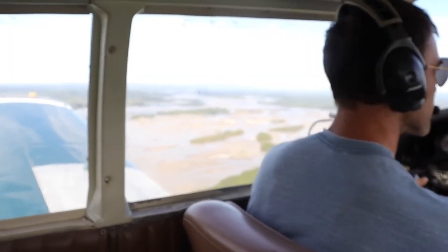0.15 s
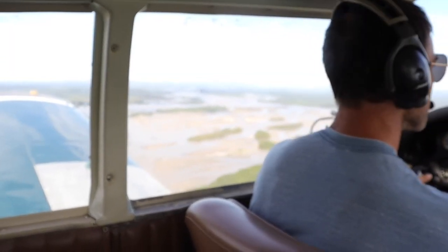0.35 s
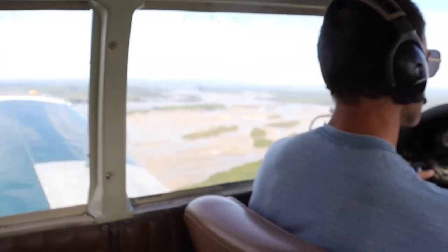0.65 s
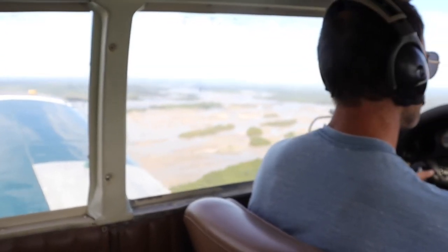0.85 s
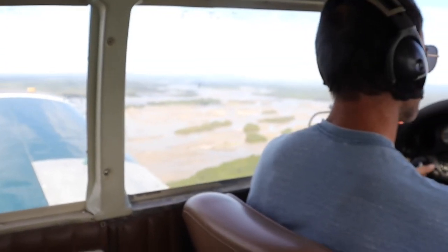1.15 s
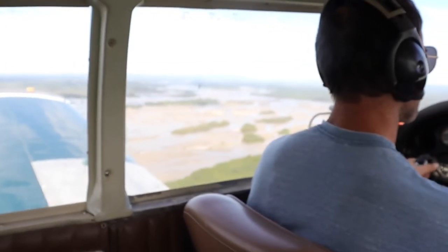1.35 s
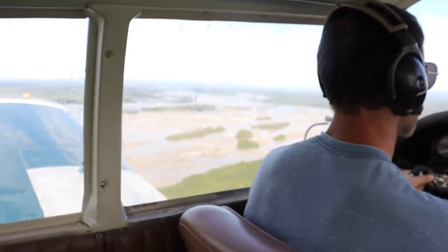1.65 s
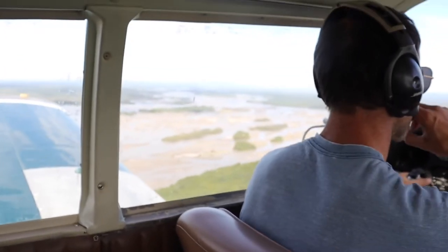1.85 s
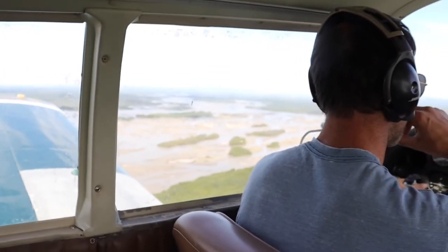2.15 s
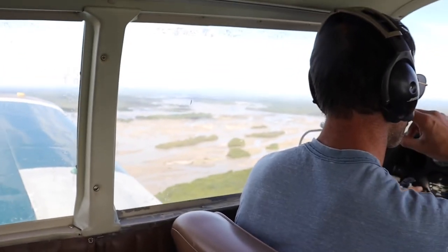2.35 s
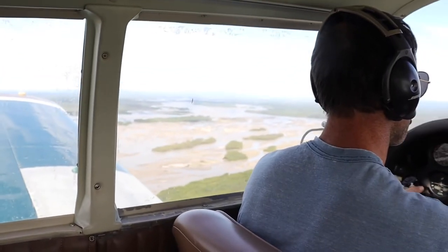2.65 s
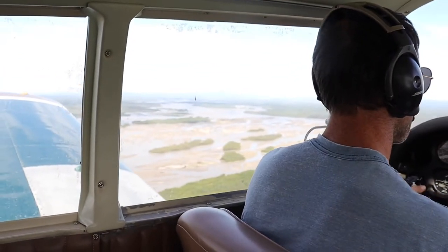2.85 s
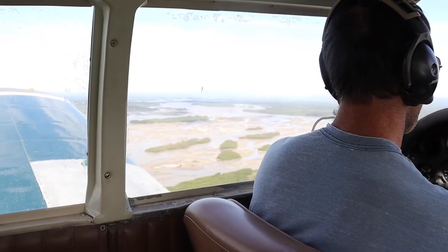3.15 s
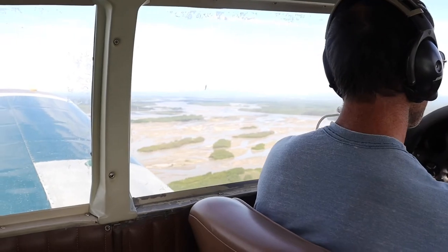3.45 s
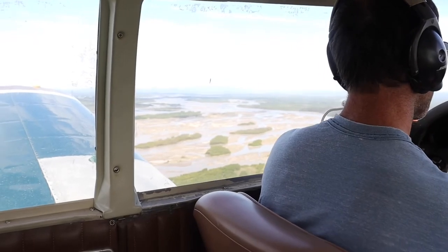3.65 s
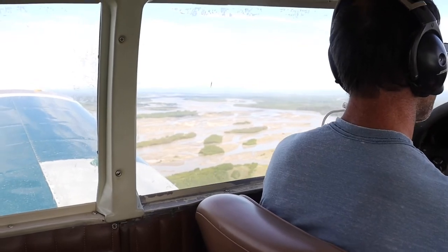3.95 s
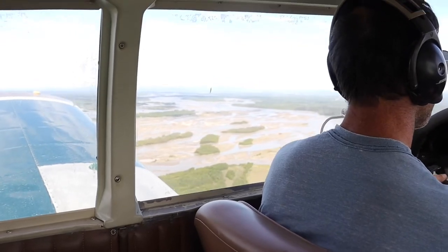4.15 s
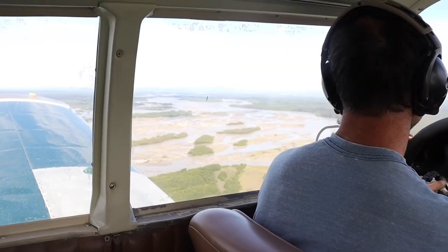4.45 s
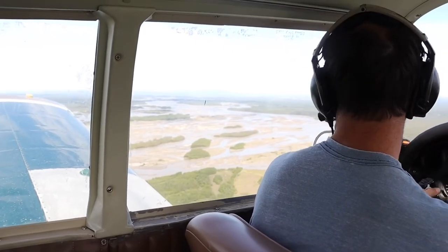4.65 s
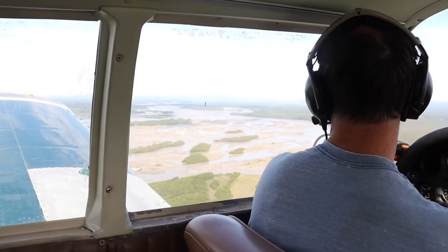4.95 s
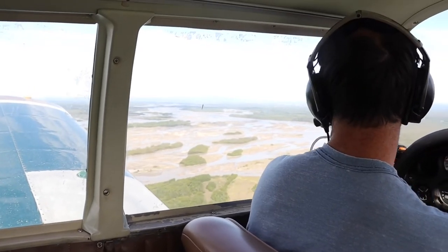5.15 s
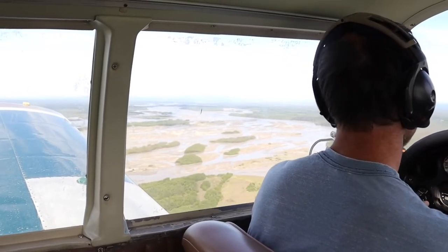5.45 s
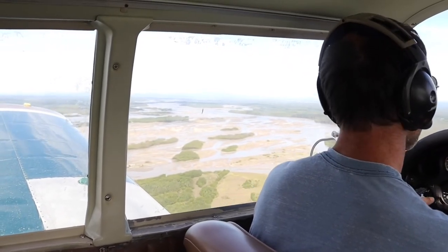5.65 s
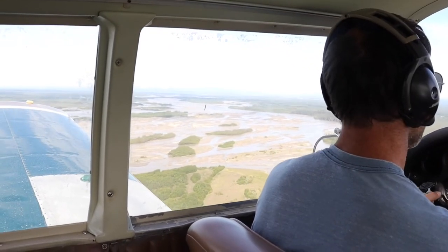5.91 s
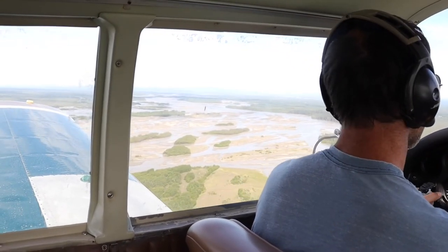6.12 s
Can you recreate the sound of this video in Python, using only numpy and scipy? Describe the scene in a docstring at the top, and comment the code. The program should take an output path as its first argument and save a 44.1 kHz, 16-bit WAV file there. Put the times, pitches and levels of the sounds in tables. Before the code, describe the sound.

A light airplane's intercom in cruise, heard directly from the wire, dry and the same in both ears. Until about 0.14 seconds a scrap of throbbing cabin roar plays, then it is chopped off. Subdued hiss remains, swelling over the next second or so, with faint engine hum, buzz, thin steady whines and a high tone that swells periodically. At 2.05 a hard pop and rumbling air buffet hit the boom microphone, followed at 2.14 by a louder, deeper, raspier one, overloaded and falling in pitch. Muffled roar follows, brightening until it cuts off at 2.5. The hiss is pushed down, then slowly rises. At 3.78 a single low, rounded thump with little rasp opens another stretch of roar, cut at 4.13. Hiss and whines fade back up and continue steadily to the end, about 6.4.

```python
"""A clipped scrap of cabin roar, then hiss and thin electrical whines: a light airplane's intercom in cruise.
Air buffets the boom microphone, twice in quick succession while a hand shields it, then once more.
Each buffet is a pop, rumbling noise of falling pitch and a rasp; the roar is throbbing noise and engine tones.
The squelch lets the microphone through at set times over a steady line of noise and sines.
Gain control clamps down on every burst, then slowly lets the hiss swell back."""
import sys
import numpy as np
from scipy import signal
from scipy.fft import rfft, irfft
from scipy.io import wavfile

SR = 44100
rng = np.random.default_rng(int(sys.argv[2]) if len(sys.argv) > 2 else 0)


def unload_audio(sound):
    """Save the sound as a 16-bit wav file, at the path given as the first command line argument."""
    columns = np.transpose(np.atleast_2d(sound))
    # keep every value between -1 and 1, then stretch to whole-number steps
    steps = np.round(np.clip(columns, -1, 1) * 32767)
    wavfile.write(sys.argv[1], SR, steps.astype(np.int16))


N = 276948
TIME = np.arange(N) / SR

# Air buffets on the capsule; rasp is relative to the eddies:
# start_s, steady_s, level_db, fall_db_per_s, first_centre_hz, last_centre_hz, rasp_db
AIR_BUFFETS = [(2.0453, 0.098, 27.5, 900, 473, 300, -8.5), (2.135, 0.06, 33.5, 900, 397, 170, -4),
               (3.776, 0.041, 28, 107, 315, 110, -30)]
# Pop of the diaphragm that starts each buffet: start_s, height_db, pitch_hz, t60_s
DIAPHRAGM_POPS = [(2.0455, 32, 650, .05), (2.1367, 38.5, 332, 0.048), (3.7751, 30.5, 273, .07)]
# Colour of the air rasping in the foam cover: frequency_hz, density_db_per_hz (relative)
RASP_COLOUR = [(300, -28), (750, -2.5), (1250, 2), (2100, -4.5), (3500, -16), (8000, -47)]
# Times when the squelch is open: start_s, end_s
SQUELCH_OPEN = [(-.1, .137), (2.0455, 2.119), (2.137, 2.508), (3.7753, 4.130)]
# Shielding of the microphone by a turn of the head, later by a hand:
# start_s, end_s, clearing_s, depth (0-1)
MIC_SHIELDS = [(0, 0.03, 0.12, 0.16), (1.754, 2.193, .2, 0.99)]
# Colour of the cabin through the microphone: frequency_hz, density_db_per_hz (relative)
CABIN_COLOUR = [(40, -46.5), (100, -22), (300, -17.5), (520, -12), (820, 2), (1060, -0.5), (1350, -5),
                (3000, -4.5), (4200, -9), (5500, -18), (7200, -23), (10000, -34.5), (15500, -42)]
# Engine drone, relative to the roar or to the hum level: multiple of the crank pitch, level_db
ENGINE_DRONE = [(2, -45), (3, -27), (4, -39), (6, -33.5), (7, -32.5), (12, -27)]
# Colour of the line hiss: frequency_hz, density_db_per_hz (relative)
HISS_COLOUR = [(25, -19), (60, -7.5), (150, -4), (400, -2), (800, 0.5), (1700, 1), (2600, -2), (4000, -5.5),
               (7000, -7.5), (11000, -8.5), (15800, -12)]
# Whine of the electrics: multiple of the whine pitch, level_db
WHINE_PARTIALS = [(1, -31), (2, -44.5), (3, -42.5), (4, -47), (5, -35.5)]
# Ignition buzz: multiple of the buzz pitch, level_db
BUZZ_PARTIALS = [(3, -47.5), (4, -56), (5, -48.5), (6, -43.5), (7, -45), (8, -48), (9, -48), (14, -58)]

# All source levels are rms dB ahead of the gain control
ROAR_DB, ROAR_TREBLE_DB = 11, 1
SHIELD_DB, SHIELD_TREBLE_DB = 10, -25  # full shielding makes the roar louder and duller
HISS_DB, SUPPLY_DB, HUM_DB = -22.5, -30.5, -24
CRANK_HZ, WHINE_HZ, BUZZ_HZ, SUPPLY_HZ, STROBE_HZ = 33.5, 996.8, 194.3, 14138.7, 3236
# Slow stage of the gain control: usual depth, share taken of any deeper cut, recovery
SLOW_DEPTH_DB, SLOW_SHARE, SLOW_DB_PER_S = 19.5, 0.33, 12.5
CUTOFF_HZ = 15900


def buffets(slowing_s=0.066, width=1.68, shove_db=-17, shove_hz=230, flutter_db=1.0, vent_hz=50):
    """Gusts rumble and rasp, deeper as the air slows; the capsule's vent lets out the lowest part."""
    out = np.zeros(N)
    age = TIME[:SR // 2]
    for start, steady, level_db, fall_db, first_hz, last_hz, rasp_db in AIR_BUFFETS:
        centre_hz = last_hz + (first_hz - last_hz) * np.exp(-age / slowing_s)
        air, push = rng.standard_normal((2, len(age)))
        # two passes steepen the band
        band = moving_band(moving_band(air, centre_hz, width), centre_hz, width)
        eddies = rms_one(band / np.sqrt(centre_hz))
        shove = from_db(shove_db) * rms_one(butter(push, shove_hz, "low"))
        rasp = from_db(rasp_db) * noise(RASP_COLOUR)[:len(age)]
        flutter = flutter_db * drift(50)[:len(age)]
        force_db = level_db - fall_db * np.maximum(age - steady, 0) + flutter
        add(out, start, from_db(force_db) * (eddies + shove + rasp))
    add_pops(out, age)
    return butter(out, vent_hz, "high")


def add_pops(out, age):
    """The diaphragm is knocked and rings down as a decaying sine, first swing negative."""
    for start, height_db, hz, t60 in DIAPHRAGM_POPS:
        decay = np.exp(-np.log(1000) * age / t60)
        add(out, start, -from_db(height_db) * decay * np.sin(2 * np.pi * hz * age))


def cabin(treble_hz=4500, throb=0.056):
    """Slipstream and engine through the noise-cancelling capsule; the roar throbs with the firings."""
    shielded = shielding()
    level_db = ROAR_DB + SHIELD_DB * shielded
    treble_db = ROAR_TREBLE_DB + SHIELD_TREBLE_DB * shielded
    roar = noise(CABIN_COLOUR) * (1 + throb * tones(CRANK_HZ, [(3, 0)]))
    # a shelf: the treble alone is raised or lowered
    roar = roar + (from_db(treble_db) - 1) * butter(roar, treble_hz, "high", order=1)
    drone = tones(CRANK_HZ + 0.093 * drift(4.9), ENGINE_DRONE)
    return from_db(level_db) * (roar + drone)


def shielding():
    """How closely the microphone is shielded, 0 to 1: on at once, cleared along a ramp."""
    closeness = np.zeros(N)
    for start, end, clearing_s, depth in MIC_SHIELDS:
        clearing = np.clip(1 - (TIME - end) / clearing_s, 0, 1)
        closeness += depth * (TIME >= start) * clearing
    return closeness


def line():
    """Coloured noise and gently wandering sines: hiss, whines and engine hum always on the wire."""
    hiss = from_db(HISS_DB + 0.67 * drift(12)) * noise(HISS_COLOUR)
    whine = tones(WHINE_HZ + 0.26 * drift(2.0), WHINE_PARTIALS) * from_db(0.84 * drift(16))
    buzz = tones(BUZZ_HZ + 0.3 * drift(1.99), BUZZ_PARTIALS)
    supply = tones(SUPPLY_HZ + 0.54 * drift(1), [(1, SUPPLY_DB)])
    hum = from_db(HUM_DB) * tones(CRANK_HZ + 0.194 * drift(3), ENGINE_DRONE)
    return hiss + whine + buzz + supply + hum + strobe()


def strobe(first_s=0.18, period_s=1.34, charge_s=0.36, charging_db=-35.961, idle_db=-43.961, wander_hz=3):
    """A thin whine swells at regular intervals, as of a strobe light recharging after each flash."""
    is_charging = 1. * ((TIME - first_s) % period_s < charge_s)
    level_db = idle_db + (charging_db - idle_db) * lag(is_charging, 0.025)
    return from_db(level_db) * tones(STROBE_HZ + wander_hz * drift(2.1), [(1, 0)])


def scene(headroom_db=37, leak_db=-52, closing_s=0.00066):
    """The microphone amplifier saturates, and the squelch gates it onto one wire for both ears."""
    is_open = 1. * sum((TIME >= start) & (TIME < end) for start, end in SQUELCH_OPEN)
    gate = np.maximum(is_open, lag(is_open, closing_s))  # opens at once, closes softly
    headroom = from_db(headroom_db)
    microphone = headroom * np.tanh((buffets() + cabin()) / headroom)
    wire = line() + np.maximum(gate, from_db(leak_db)) * microphone
    return np.tile(wire, (2, 1))


def gain_control(x, threshold_db=-10.5, slope=0.93, attack_s=0.0013, settle_s=0.033, late_share=0.25,
                 fast_db_per_s=110):
    """A fast stage catches the peaks; a slow stage holds most of the cut and lets go gradually."""
    level_db = 20 * np.log10(np.abs(x) + 1e-9)
    over_db = slope * np.maximum(level_db - threshold_db, 0)
    fast_db = release(over_db, fast_db_per_s)
    held_db = lag(fast_db, settle_s)
    deeper_db = np.maximum(held_db - SLOW_DEPTH_DB, 0)
    slow_db = release(np.minimum(held_db, SLOW_DEPTH_DB) + SLOW_SHARE * deeper_db, SLOW_DB_PER_S)
    cut_db = np.maximum(fast_db, slow_db)
    # part of the cut comes late, so every burst overshoots at first
    prompt_db = (1 - late_share) * lag(cut_db, attack_s)
    late_db = late_share * lag(cut_db, settle_s)
    return x * from_db(-prompt_db - late_db)


def record(dry, coupling_hz=50):
    """Gain control, overload on whatever outruns it, a coupling capacitor, and the top cut."""
    overloaded = np.clip(gain_control(dry[0]), -1, 1)
    wire = np.clip(butter(overloaded, coupling_hz, "high", order=1), -1, 1)
    top_cut = signal.ellip(12, .1, 70, CUTOFF_HZ, fs=SR, output="sos")
    return np.tile(signal.sosfilt(top_cut, wire), (2, 1))


def from_db(db):
    """Decibels to gain."""
    return 10 ** (np.asarray(db) / 20)


def rms_one(x):
    """Scale to unit rms."""
    return x / np.sqrt(np.mean(x ** 2) + 1e-20)


def butter(x, hz, kind, order=2):
    """Causal low- or high-pass."""
    return signal.sosfilt(signal.butter(order, hz, kind, fs=SR, output="sos"), x)


def moving_band(x, hz, width, size=128):
    """Two-pole resonance whose centre moves; its width is a share of the centre."""
    out, state = np.zeros(len(x)), np.zeros(2)
    for i in range(0, len(x), size):
        w = 2 * np.pi * hz[i] / SR
        r = np.exp(-.5 * w * width)
        poles = [1, -2 * r * np.cos(w), r * r]
        out[i:i + size], state = signal.lfilter([1], poles, x[i:i + size], zi=state)
    return np.diff(out, prepend=0) * hz / SR  # the difference thins the lows


def noise(colour):
    """Steady noise with the given colour; rms 1."""
    hz, level_db = np.transpose(colour)
    bins_hz = np.maximum(np.fft.rfftfreq(N, 1 / SR), 1)
    gain = from_db(np.interp(np.log(bins_hz), np.log(hz), level_db))
    return rms_one(irfft(rfft(rng.standard_normal(N)) * gain, N))


def tones(hz, partials):
    """Sines on multiples of one pitch, each at its rms level and a random phase."""
    phase = 2 * np.pi * np.cumsum(hz * np.ones(N)) / SR
    out = np.zeros(N)
    for multiple, level_db in partials:
        peak = np.sqrt(2) * from_db(level_db)
        out += peak * np.sin(multiple * phase + rng.uniform(0, 2 * np.pi))
    return out


def drift(rate, size=64):
    """Slow random wander, about `rate` turns a second; rms 1."""
    knots_s = np.arange(0, N + size, size) / SR
    bins_hz = np.fft.rfftfreq(len(knots_s), size / SR)
    spectrum = rfft(rng.standard_normal(len(knots_s))) / (1 + (bins_hz / rate) ** 2)
    return np.interp(TIME, knots_s, rms_one(irfft(spectrum, len(knots_s))))


def lag(x, seconds):
    """One-pole smoothing that starts already settled on the mean of the first 10 ms."""
    r = np.exp(-1 / (seconds * SR))
    return signal.lfilter([1 - r], [1, -r], x + 1e-18, zi=[r * x[:SR // 100].mean()])[0]


def release(cut_db, db_per_s):
    """Follows every rise at once and sinks at a steady rate."""
    return np.maximum.accumulate(cut_db + db_per_s * TIME) - db_per_s * TIME


def add(out, start, sound):
    """Mix a sound in from a given second."""
    i = round(start * SR)
    out[i:i + len(sound)] += sound[:N - i]


dry = scene()
out = record(dry)
unload_audio(out)
```